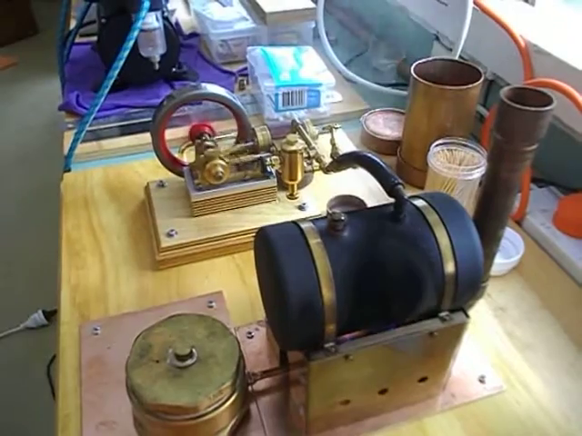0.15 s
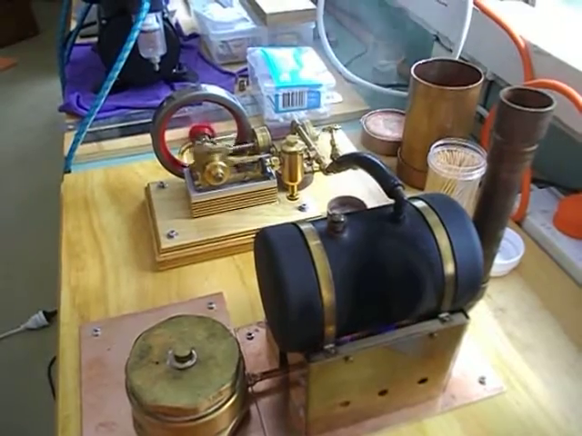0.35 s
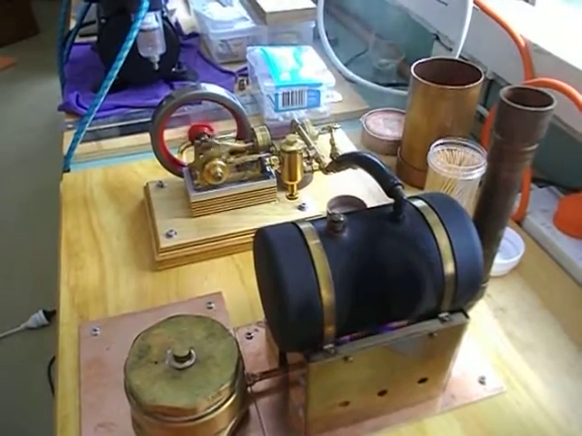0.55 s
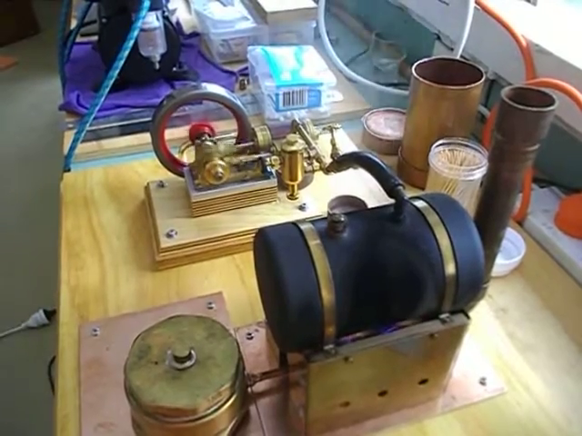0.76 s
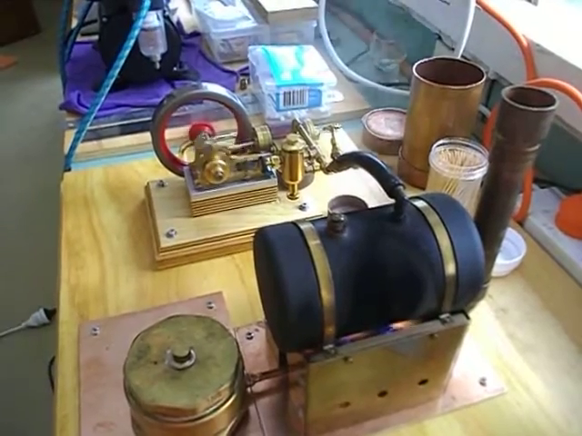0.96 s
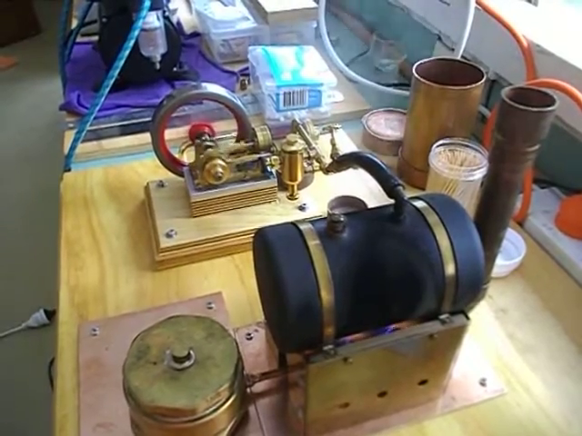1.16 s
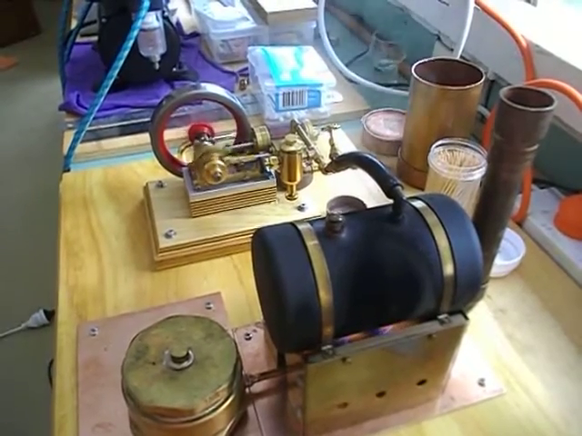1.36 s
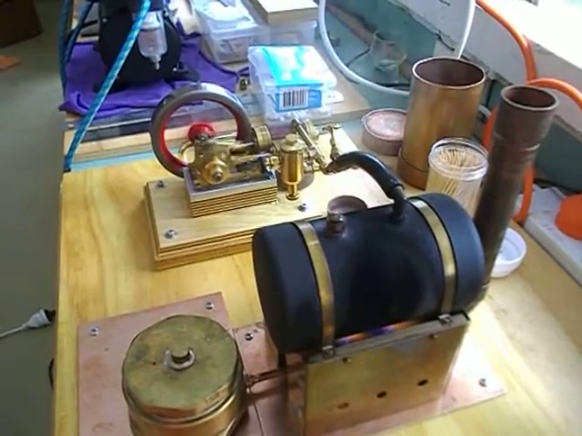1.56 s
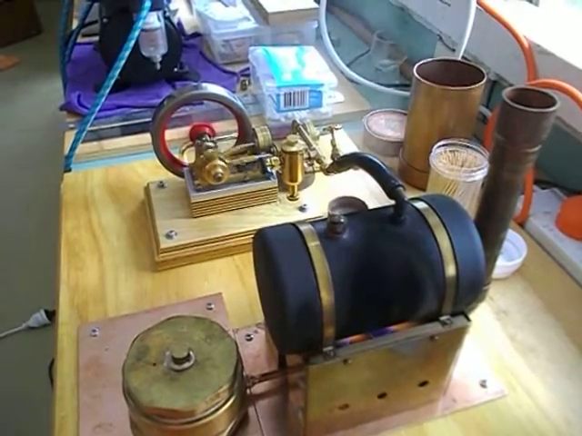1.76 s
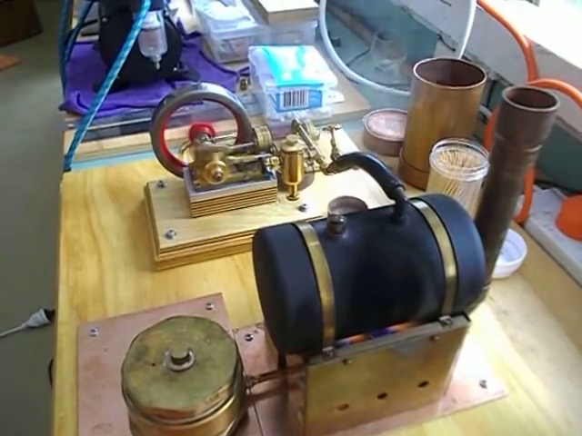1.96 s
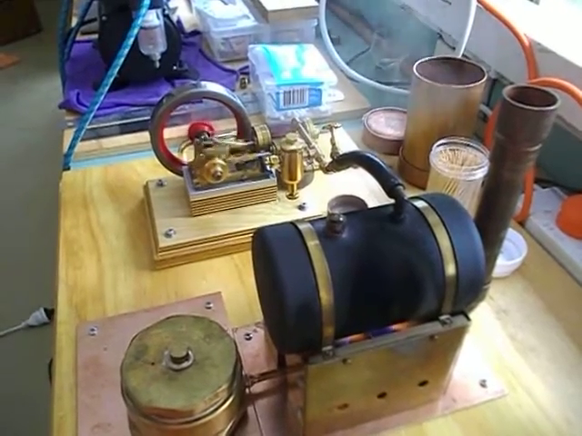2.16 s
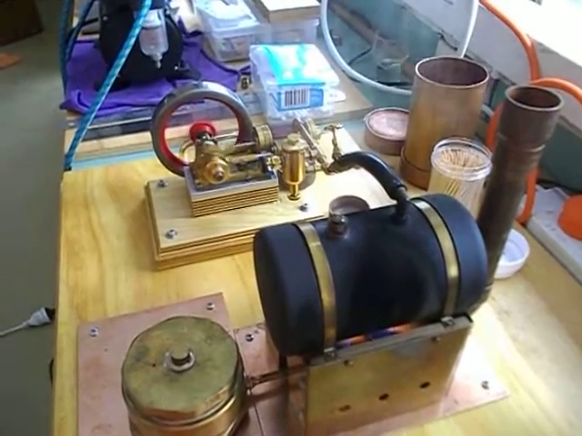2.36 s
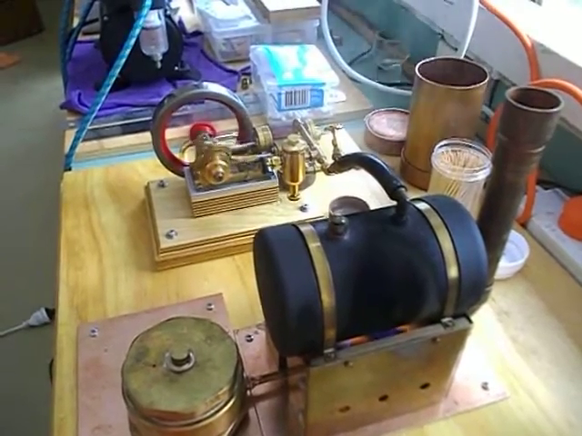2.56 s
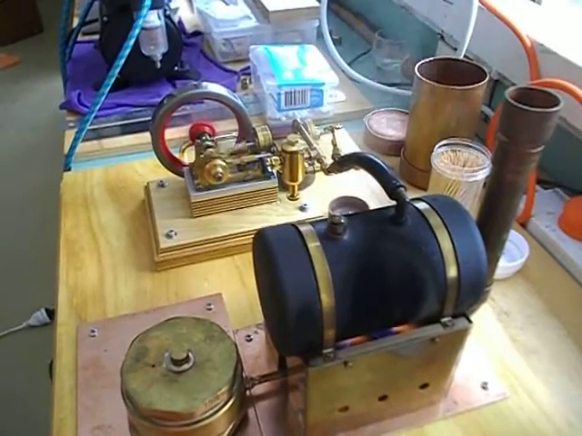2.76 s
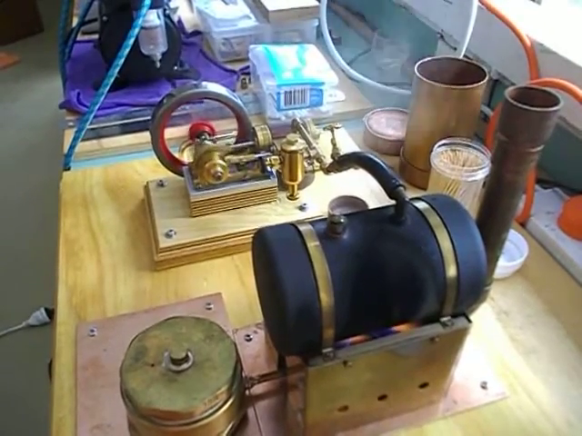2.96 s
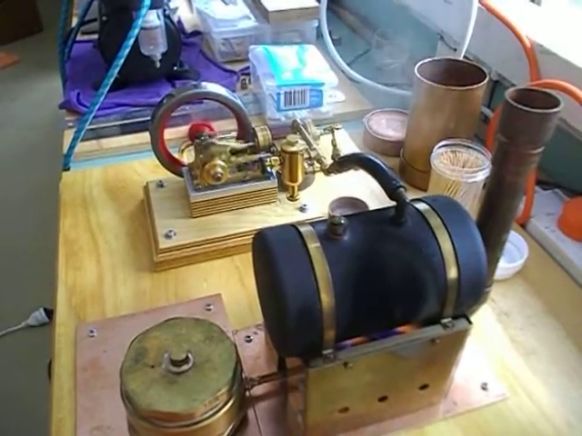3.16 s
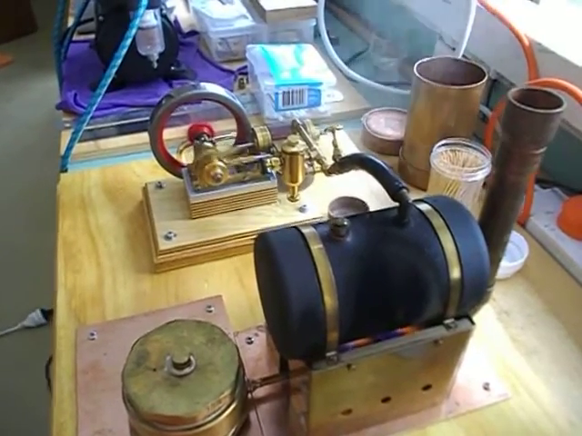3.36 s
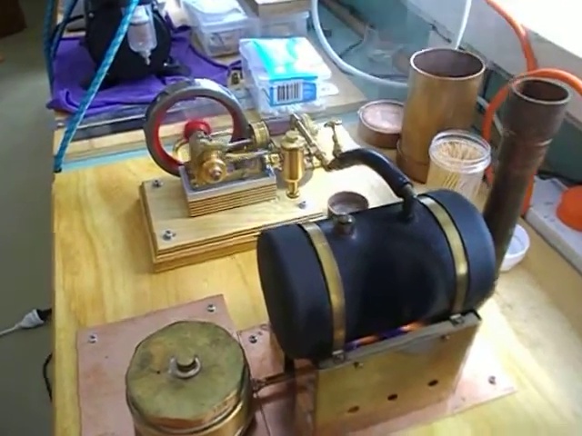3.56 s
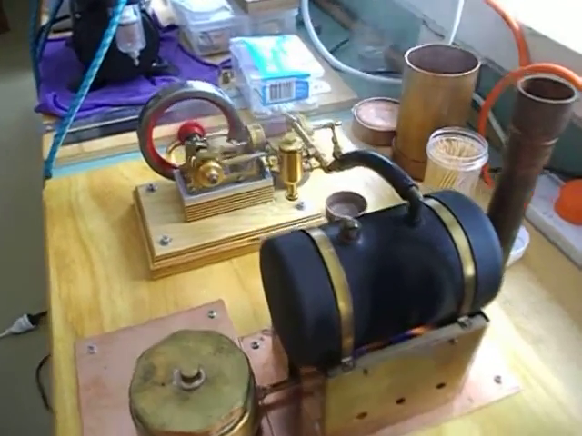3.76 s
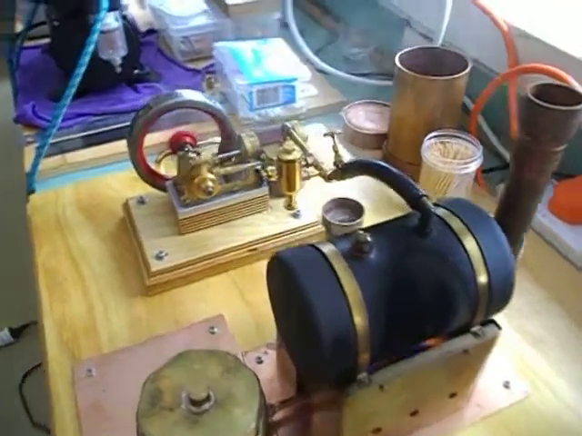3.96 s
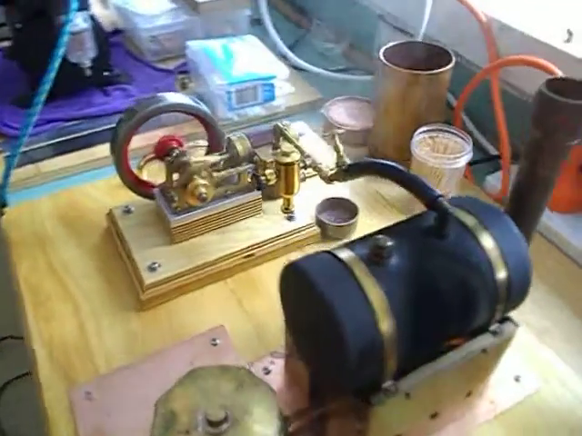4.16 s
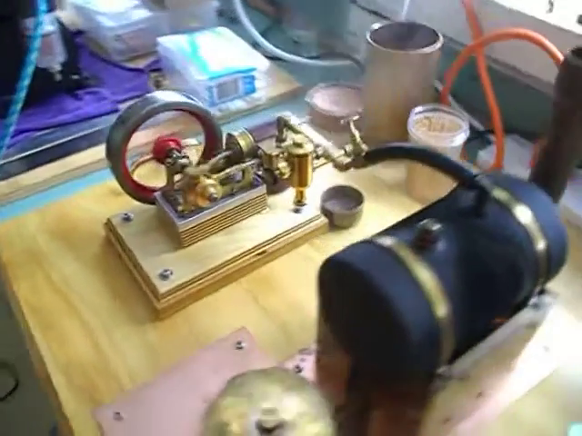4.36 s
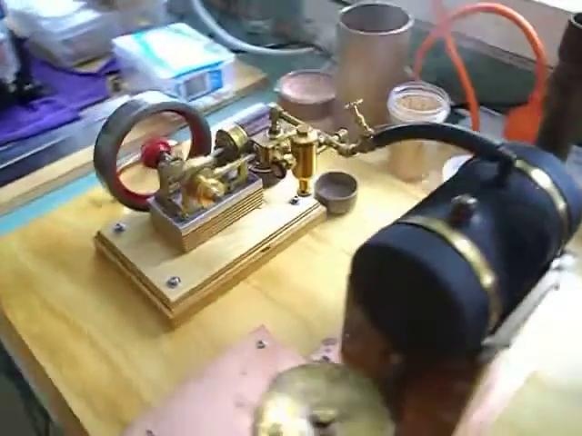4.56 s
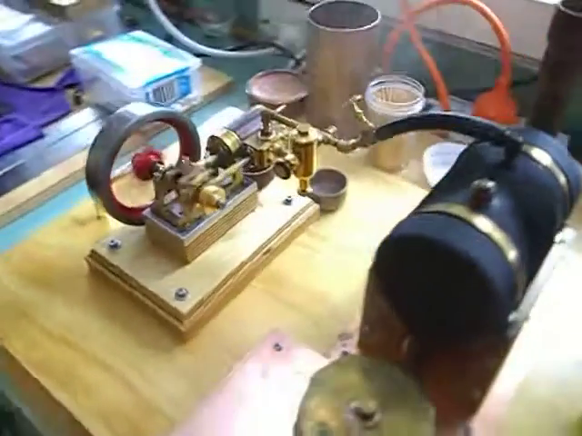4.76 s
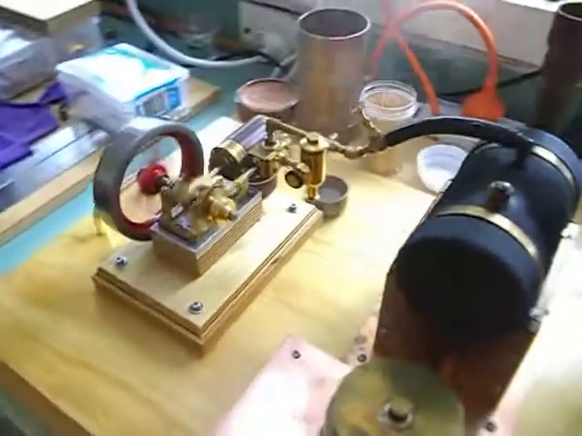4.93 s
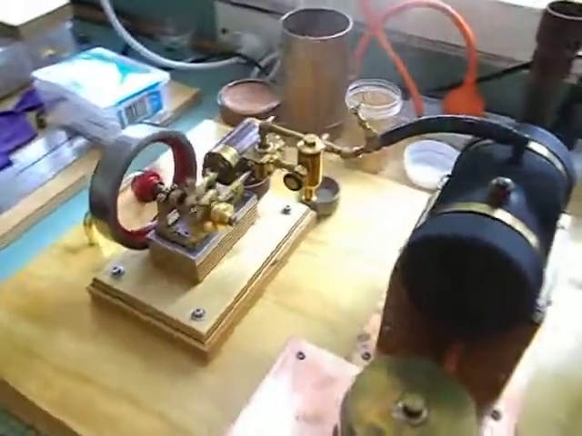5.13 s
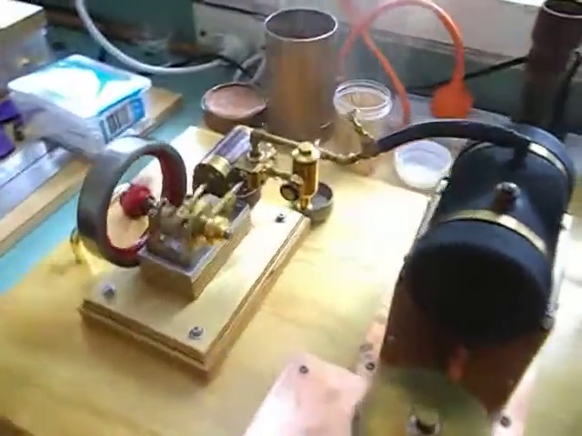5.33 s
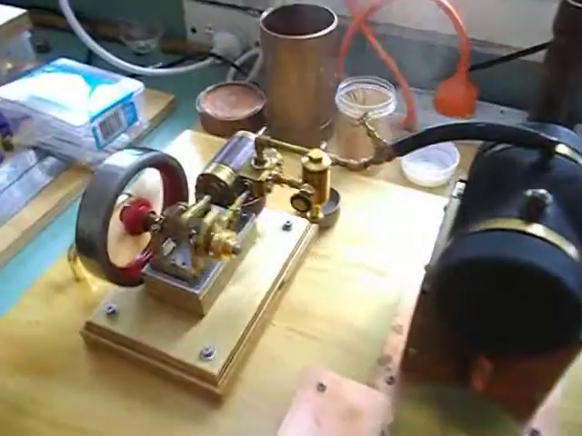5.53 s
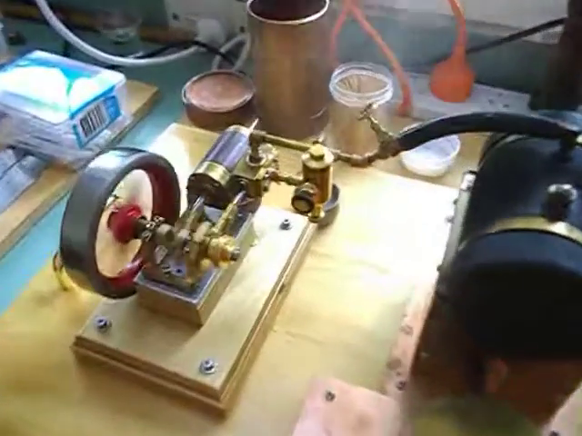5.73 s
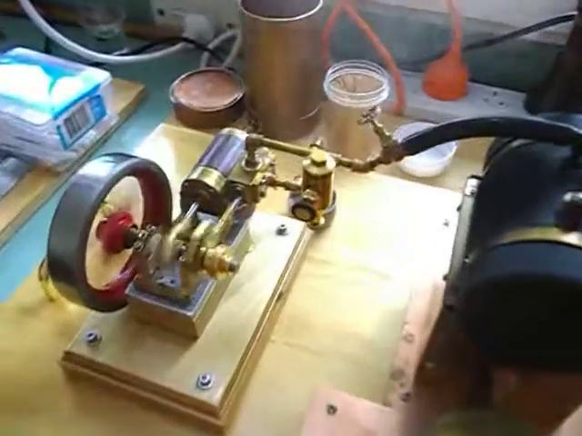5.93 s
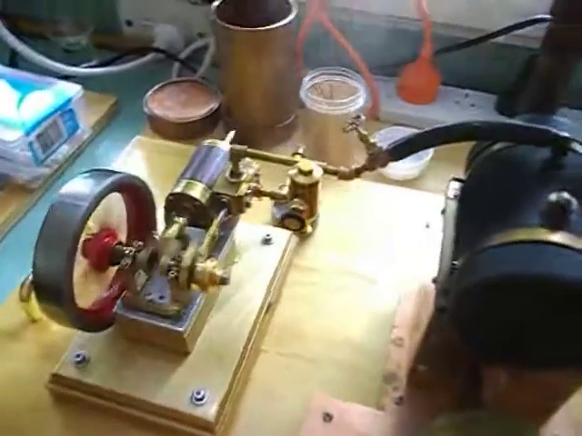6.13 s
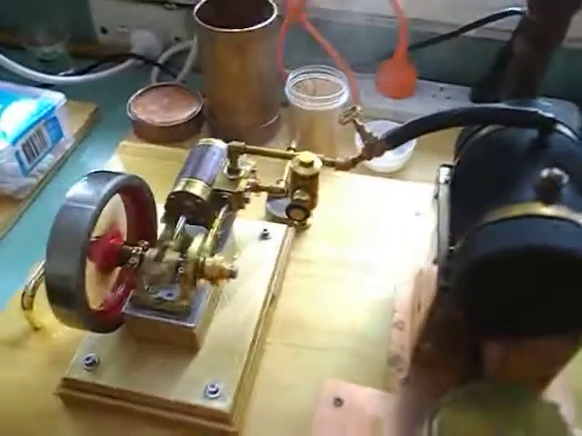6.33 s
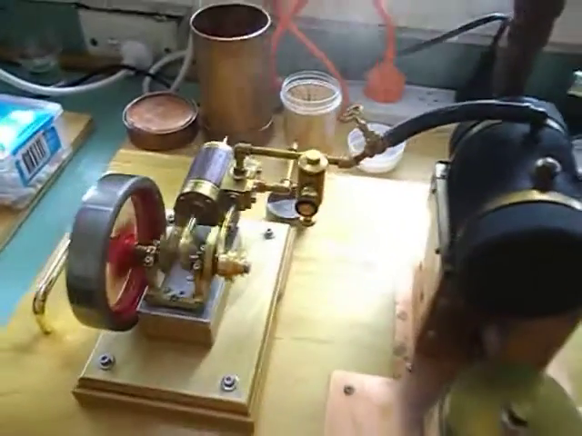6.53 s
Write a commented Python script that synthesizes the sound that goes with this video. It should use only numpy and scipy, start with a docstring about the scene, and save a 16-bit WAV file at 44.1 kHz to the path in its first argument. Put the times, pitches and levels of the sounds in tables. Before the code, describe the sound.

A small steam engine is already running on a wooden workbench and keeps an even pace, about eight turns a second, for the whole six and a half seconds. Each turn gives a short, wet, high chuff followed by two light metallic knocks from the slack crank, making a rapid clatter. A bright, fizzy hiss of steam pulses with the strokes. Beneath it are a low thrum from the bench, faint rubbing and a soft, fluttering burner rumble. Wetter spits stand out around 1, 1.5 and 3.5 seconds, and several more from 4.5 onward. From about 4 seconds the microphone moves from behind the boiler, past the cylinder, to the flywheel: the knocks turn briefly louder and crisper, the hiss swells a little and changes colour, and the chuffs become strongest from about 6 seconds. The cluttered room adds only a short, slight echo.

```python
"""Model steam engine on a workbench

On its wooden base beside the boiler, the engine runs at eight turns a second. Each turn lets out a wet
chuff, then the slack crank knocks twice; the bench thrums, steam hisses, the burner rumbles. One
microphone starts behind the boiler and, from about four seconds, moves in past the cylinder to the
flywheel: the hiss changes colour on the way."""
import sys
import numpy as np
from scipy import signal
from scipy.fft import rfft, irfft, next_fast_len
from scipy.io import wavfile
from scipy.ndimage import map_coordinates

SR = 44100
rng = np.random.default_rng(int(sys.argv[2]) if len(sys.argv) > 2 else 0)


def wav_out(sig):
    """Save sig, one row per channel (or a flat mono array), as 16-bit PCM at SR to the path in sys.argv[1]."""
    wavfile.write(sys.argv[1], SR, np.round(np.clip(np.atleast_2d(sig).T, -1, 1) * 32767).astype(np.int16))


N = 290619
TIME = np.arange(N) / SR


def from_db(db):
    """Decibels to gain."""
    return 10 ** (np.asarray(db) / 20)


def unit_rms(x):
    """Scale to unit power."""
    return x / np.sqrt(np.mean(x ** 2) + 1e-20)


def in_time(rows):
    """A curve of (time, value) rows at every sample."""
    return np.interp(TIME, *np.transpose(rows))


def at_moments(curve, times):
    """A curve's values at the given times."""
    return np.interp(times, TIME, curve)


def at_place(rows, place):
    """Each column of a table with a row per microphone place, blended along the way."""
    return [np.interp(place, np.arange(len(rows)), column) for column in np.transpose(rows)]


def drift(rate_hz):
    """Smooth random wander of unit power, mostly slower than rate_hz."""
    size = next_fast_len(N // 20 + 1)
    hz = np.arange(size // 2 + 1) * SR / 20 / size
    slow = irfft(rfft(rng.standard_normal(size)) / (1 + (hz / rate_hz) ** 2), size)
    return np.interp(np.arange(N) / 20, np.arange(size), unit_rms(slow))


def coloured(noise, spectrum):
    """Give a noise its spectrum, falling away beyond both ends; unit power."""
    size = next_fast_len(N)
    hz = np.maximum(np.arange(size // 2 + 1) * SR / size, 1)
    points_hz, db = np.transpose(spectrum)
    skirts = np.minimum(1, np.minimum(hz / points_hz[0], points_hz[-1] / hz)) ** 2
    gain = from_db(np.interp(np.log(hz), np.log(points_hz), db))
    return unit_rms(irfft(rfft(noise, size) * skirts * gain, size)[:N])


def resonate(x, hz, width_hz):
    """One resonance with gain 1 at its peak."""
    r = np.exp(-np.pi * width_hz / SR)
    poles = [1, -2 * r * np.cos(2 * np.pi * hz / SR), r * r]
    return signal.lfilter(np.array([1, 0, -1]) * (1 - r * r) / 2, poles, x)


def clicks(times, heights):
    """A train of single impulses."""
    return np.bincount(np.clip(times * SR, 0, N - 1).astype(int).ravel(), heights.ravel(), N)


def scatter(x, lags_s, feedback):
    """Allpass echoes: a blow spreads out in time and keeps its colour."""
    for lag in lags_s:
        loop = np.concatenate([[1], np.zeros(int(lag * SR)), [feedback]])
        x = signal.lfilter(loop[::-1], loop, x + 1e-18)
    return np.roll(x, -int(max(lags_s) * SR))  # the bulk of the blow stays at its moment


def each_turn(turns, share):
    """The moments at which the crank passes a given share of its turn."""
    return np.interp(np.arange(share, turns[-1]), turns, TIME)


def workshop(x, t60_s):
    """The cluttered room returns a short diffuse tail."""
    t = TIME[:SR // 2]
    tail = rng.standard_normal(len(t)) * from_db(-60 * t / t60_s) * (t > .003)
    return signal.fftconvolve(x, tail / np.linalg.norm(tail))[:N]


# Burner and room, the same from every place: f/Hz, relative level/dB
BURNER_SPECTRUM = [(15, 5), (26, -4), (36, 2.5), (54, -14), (66, 0), (78, -4), (92, -11), (115, -11),
                   (133, -13), (150, -12.5), (167, -15), (220, -17.5), (400, -25.5), (1000, -30)]


def burner(flutter_db):
    """The flame's low, fluttering rumble."""
    return coloured(rng.standard_normal(N), BURNER_SPECTRUM) * from_db(flutter_db * drift(6.4))


# Partials of the bench under the engine: multiple of the turning rate, relative level/dB
THRUM_PARTIALS = [(3, -5), (8, -2), (9, -16), (10, -10.5), (16, -18), (17, -20), (20, -21.5), (21, -22),
                  (29, -29)]
# The thrum at the microphone: t/s, level/dB
THRUM_LEVEL = [(0, -41.5), (2.1, -37.2), (4.15, -37), (4.6, -40.5), (5.6, -42), (6.59, -38.5)]


def bench(turns, waver):
    """The unbalanced crank shakes the bench unevenly, most where it resonates."""
    thrum = 0
    for multiple, db in THRUM_PARTIALS:
        angle = 2 * np.pi * (multiple * turns + rng.random())
        partial = (1 + waver * drift(5.5)) * np.cos(angle) + waver * drift(6.2) * np.sin(angle)
        thrum += from_db(db) * partial
    return np.sqrt(2) * from_db(in_time(THRUM_LEVEL)) * thrum


# Rubbing, heard through the wooden base: f/Hz, relative level/dB
BASE_SPECTRUM = [(300, -14.5), (480, -9.5), (600, -1), (760, 0.5), (860, -1), (990, 1), (1150, -3.5),
                 (1450, -15), (1800, -8.5), (2500, -8.5), (4000, -27)]


def rubbing(turns, swing_db, grain_db):
    """Piston and bearings rub with a fine grain, hardest on the working stroke."""
    load_db = swing_db * np.cos(2 * np.pi * (turns - .15)) + grain_db * drift(160)
    return coloured(rng.standard_normal(N) * from_db(load_db), BASE_SPECTRUM)


# Surfaces close to the steam, a row per microphone place: lag/ms, level/dB
BENCH_ECHO = [(1.115, -18), (1.28, -16), (1.38, -15), (1.42, -15)]
BOILER_ECHO = [(.49, -23), (.41, -11), (.39, -38), (.39, -38)]
FRAME_ECHO = [(1.05, -35), (1.05, -35), (1.05, -28), (1.05, -16)]


def reflections(steam, place):
    """Three echoes comb the steam's sound, shifting as the microphone moves."""
    echoes = 0
    for surface in (BENCH_ECHO, BOILER_ECHO, FRAME_ECHO):
        lag_ms, db = at_place(surface, place)
        echoes += from_db(db) * map_coordinates(steam, [np.arange(N) - lag_ms * SR / 1000], order=3)
    return echoes


# The hiss from each of the four microphone places: f/Hz, relative level/dB
HISS_BEHIND_BOILER = [(1500, -18.5), (2000, -21), (3300, -12), (3680, -2), (4050, -6.5), (4400, -5),
                      (5050, -7.5), (5700, -0.5), (6300, 2), (7000, -4), (9150, 0.5), (9550, -7),
                      (10250, -8.5), (11000, -18)]
HISS_BESIDE_BOILER = [(1500, -23), (2000, -26), (3300, -11.5), (3850, -4), (4500, -8), (5300, -4.5),
                      (5750, 1), (6300, 5.5), (7000, -4), (7750, -6), (8900, -1.5), (9900, 0.5),
                      (10900, -16), (11600, -18)]
HISS_AT_CYLINDER = [(1500, -25), (2000, -23), (3300, -19.5), (3900, -9), (4700, -9), (5900, 0.5),
                    (6650, 0.5), (7550, -12), (8100, -8), (9000, -7), (10100, -5), (10700, -8),
                    (11400, -15.5)]
HISS_AT_FLYWHEEL = [(1500, -34), (2000, -26), (3400, -11), (4000, -6.5), (5300, -5), (5750, -2), (6050, -3),
                    (6550, 5), (7250, -7), (8450, -1.5), (10000, -6.5), (10550, -6), (11050, -13),
                    (11550, -16)]
# Three swells of steam a turn: lag after the outward knock/turns, width/turns, level/dB
STEAM_SWELLS = [(.94, .04, 5.4), (.2, .11, 3.6), (.66, .09, 1.8)]


def hiss(turns, place, fizz_per_s, fizz_db, sputter_db):
    """Wet steam, smooth jet plus fizz, swells with each stroke; its colour depends on the place."""
    flow_db = 0
    for share, width, db in STEAM_SWELLS:
        from_peak = (turns - share + .5) % 1 - .5
        flow_db += db * np.exp(-.5 * (from_peak / width) ** 2)
    flow = unit_rms(from_db(flow_db + sputter_db * drift(90)))
    fizz = (rng.random(N) < fizz_per_s / SR) * rng.uniform(-1, 1, N)
    jet = rng.standard_normal(N) + from_db(fizz_db) * unit_rms(fizz)
    spectra = [HISS_BEHIND_BOILER, HISS_BESIDE_BOILER, HISS_AT_CYLINDER, HISS_AT_FLYWHEEL]
    return flow * sum(np.maximum(0, 1 - abs(place - k)) * coloured(jet, spectrum)
                      for k, spectrum in enumerate(spectra))


# Resonances of the exhaust port: f/Hz, width/Hz, level/dB
PORT_MODES = [(5670, 480, -7), (6230, 280, 3.5), (6600, 280, -6), (8800, 670, -9), (9300, 460, -9)]
# Slugs of water leaving with the exhaust: t/s, level/dB over a usual chuff
WATER_SLUGS = [(1.02, 4), (1.40, 5), (1.64, 7), (3.50, 7.5), (4.49, 8.5), (5.24, 7.5), (5.49, 5.5),
               (5.74, 4), (5.86, 4), (6.24, 4)]


def chuffs(turns, level_db, lead_s, burst_s, chuff_spread_db, drop_spread_db, drops=14):
    """The exhaust opens just before the outward knock; bursting drops of condensate ring the port."""
    open_s = each_turn(turns, 0) - lead_s
    wet_db = chuff_spread_db * rng.standard_normal(len(open_s))
    for slug_s, db in WATER_SLUGS:
        wet_db[np.argmin(abs(open_s - slug_s))] = db
    strength = from_db(at_moments(level_db, open_s) + wet_db)
    times = open_s[:, None] + burst_s * rng.gamma(3, 1, (len(open_s), drops))  # starts fast, thins out
    sizes = from_db(drop_spread_db * rng.standard_normal(times.shape)) * rng.choice([-1, 1], times.shape)
    sizes *= strength[:, None] / np.linalg.norm(sizes, axis=1, keepdims=True)
    bursts = clicks(times, sizes)
    return sum((-1) ** k * from_db(db) * resonate(bursts, hz, width)
               for k, (hz, width, db) in enumerate(PORT_MODES))


# Resonances of the engine frame and its base: f/Hz, width/Hz, level/dB from afar, level/dB close up
FRAME_MODES = [(240, 36, -16, -14.5), (640, 107, -3.5, 0.5), (793, 150, -5.5, -7.5), (1019, 88, 2, 0),
               (1235, 130, -8.5, -29), (1788, 140, -1, -14), (2280, 250, -7.5, -6), (2650, 235, -9, -4),
               (2950, 190, 1.5, -2.5), (3136, 160, 1, -4.5), (3830, 280, -12, -7)]


def knocks(times, level_db, close_up, tilt_db_per_octave, chatter_s, bounce_db=-13, contacts=5):
    """The bearing takes up its slack: one blow amid a few light contacts, each ringing the frame."""
    lag_s = chatter_s * rng.standard_normal((len(times), contacts))
    lag_s[:, 0] = 0
    force = np.where(np.arange(contacts) > 0, from_db(bounce_db) * rng.choice([-1, 1], lag_s.shape), 1)
    force *= from_db(level_db)[:, None] / np.linalg.norm(force, axis=1, keepdims=True)
    blows = clicks(times[:, None] + lag_s, force)
    ring = 0
    for k, (hz, width, far_db, close_db) in enumerate(FRAME_MODES):
        db = (close_db if close_up else far_db) + tilt_db_per_octave * np.log2(hz / 1800)
        ring += (-1) ** k * from_db(db) * resonate(blows, hz, width)
    return ring


def crank(turns, nearness, level_db, spread_db, return_share):
    """The slack crank knocks twice a turn; close up, the outward knock is crisper, the return duller."""
    out_s, back_s = each_turn(turns, 0), each_turn(turns, return_share)
    out_db = at_moments(level_db, out_s) + spread_db * rng.standard_normal(len(out_s))
    back_db = at_moments(level_db, back_s) + spread_db * rng.standard_normal(len(back_s))
    far = knocks(out_s, out_db, close_up=False, tilt_db_per_octave=0, chatter_s=.0016)
    far += knocks(back_s, back_db, close_up=False, tilt_db_per_octave=-.5, chatter_s=.001385)
    close = knocks(out_s, out_db + 1.2, close_up=True, tilt_db_per_octave=2.5, chatter_s=.002)
    close += knocks(back_s, back_db, close_up=True, tilt_db_per_octave=-2.1, chatter_s=.001255)
    far = scatter(far, lags_s=(.0004, .0009), feedback=.6)
    close = scatter(close, lags_s=(.0007,), feedback=.61)
    return np.sqrt(1 - nearness) * far + np.sqrt(nearness) * close


def flywheel_turns(first_knock_s, turn_s, slowing_s_per_turn):
    """Turns made so far, whole at each outward knock; each takes a trace longer than the last."""
    even_turns = (TIME - first_knock_s) / turn_s
    return even_turns - slowing_s_per_turn / turn_s * even_turns ** 2 / 2


# The microphone's path: t/s, place (0 behind the boiler, 1 beside it, 2 at cylinder, 3 at flywheel)
MIC_PATH = [(3.7, 0), (4.2, 0.6), (4.5, 1.4), (5.0, 2), (5.55, 2.5), (5.85, 3)]
# The balance, a row per place: level/dB of hiss, chuffs, knocks and rubbing
PLACE_LEVELS = [(-30.1, 7, 0.1, -44), (-27.8, 5, 3.3, -43.6), (-26.0, 10, 0.6, -43.4),
                (-27.6, 14, -1.0, -41.7)]


def scene():
    """Steam and mechanism along the microphone's path, over the bench and the burner."""
    turns = flywheel_turns(first_knock_s=.0504, turn_s=.12307, slowing_s_per_turn=.000035)
    place = in_time(MIC_PATH)
    hiss_db, chuff_db, knock_db, rubbing_db = at_place(PLACE_LEVELS, place)
    steam = from_db(hiss_db) * hiss(turns, place, fizz_per_s=1200, fizz_db=-7.5, sputter_db=.86)
    steam += chuffs(turns, chuff_db, lead_s=.0145, burst_s=.0016, chuff_spread_db=2, drop_spread_db=2.2)
    steam += reflections(steam, place)
    nearness = np.minimum(place, 1)
    engine = steam + crank(turns, nearness, knock_db + 4, spread_db=1, return_share=.332)
    room = from_db(-13) * workshop(engine, t60_s=.3)
    friction = from_db(rubbing_db) * rubbing(turns, swing_db=.4, grain_db=2)
    rumble = bench(turns, waver=.39) + from_db(-39) * burner(flutter_db=1.2)
    return (engine + room + friction + rumble)[None]


def record(dry):
    """The microphone has a narrow dip in the treble; the top is rounded off, then cut steeply."""
    dipped = dry - .5 * resonate(dry, hz=11030, width_hz=350)
    rounded = signal.sosfilt(signal.butter(14, 11500, fs=SR, output="sos"), dipped)
    return signal.sosfilt(signal.ellip(12, .2, 90, 12150, fs=SR, output="sos"), rounded)


dry = scene()
out = record(dry)
wav_out(out)
```